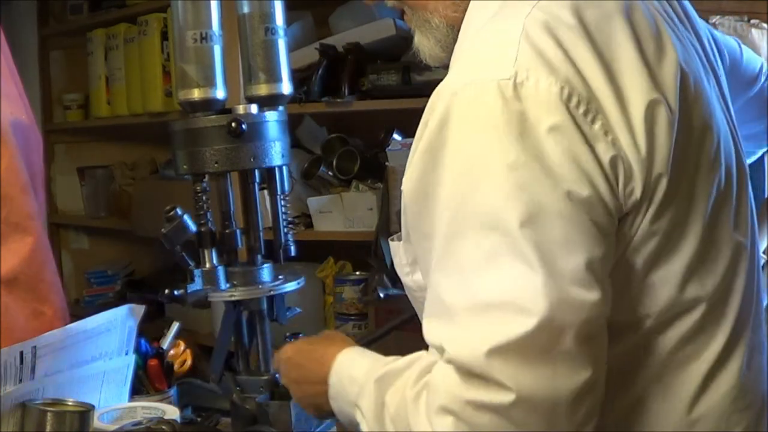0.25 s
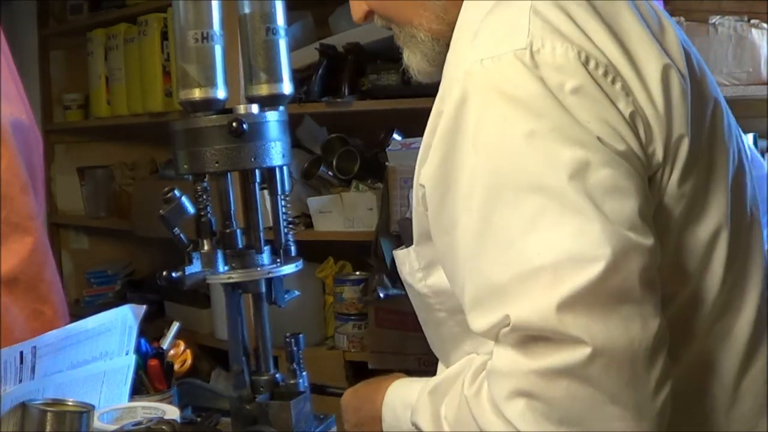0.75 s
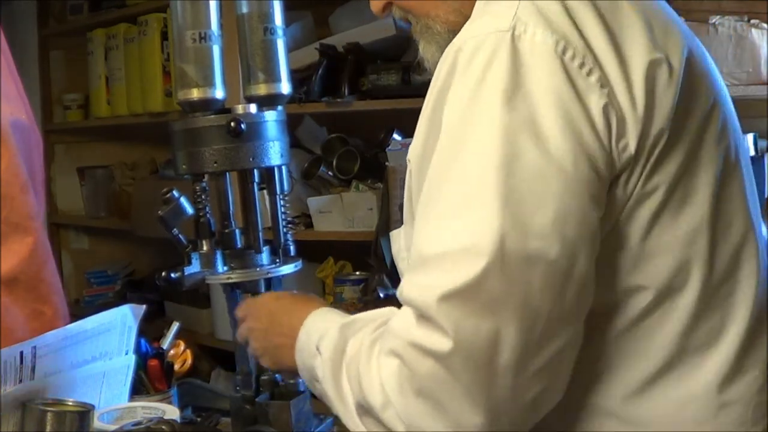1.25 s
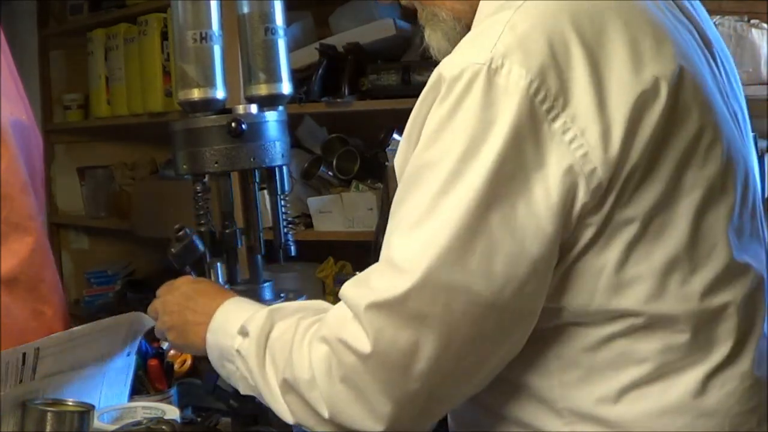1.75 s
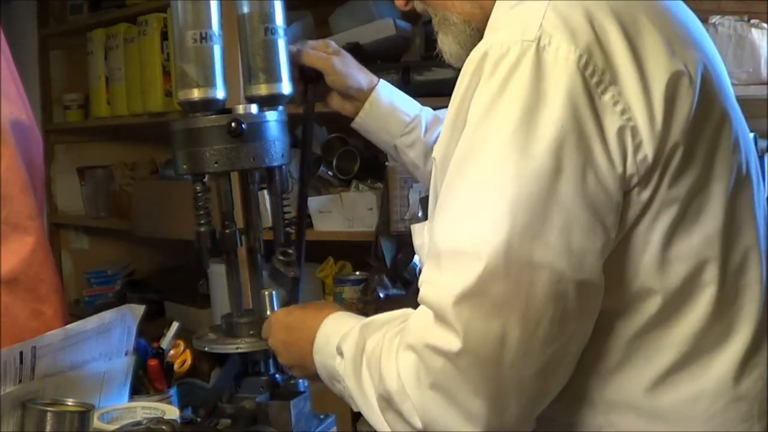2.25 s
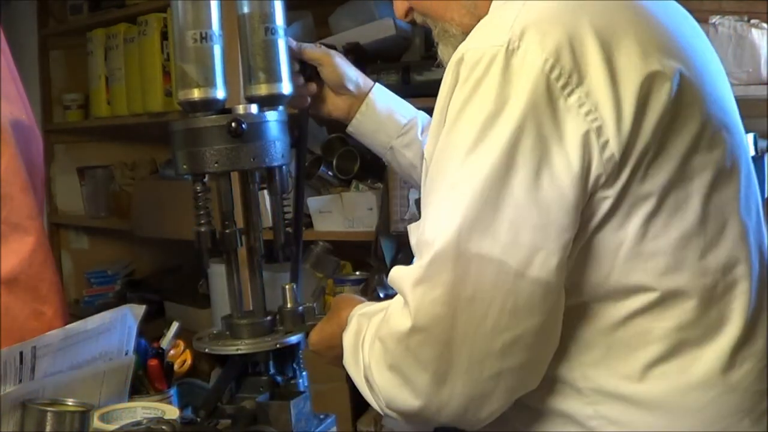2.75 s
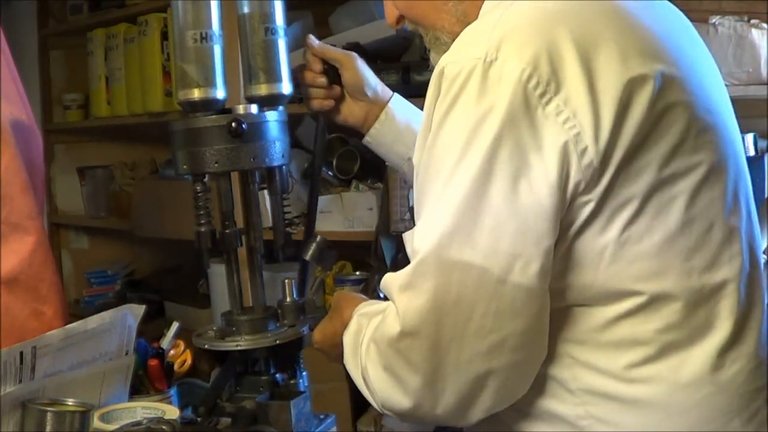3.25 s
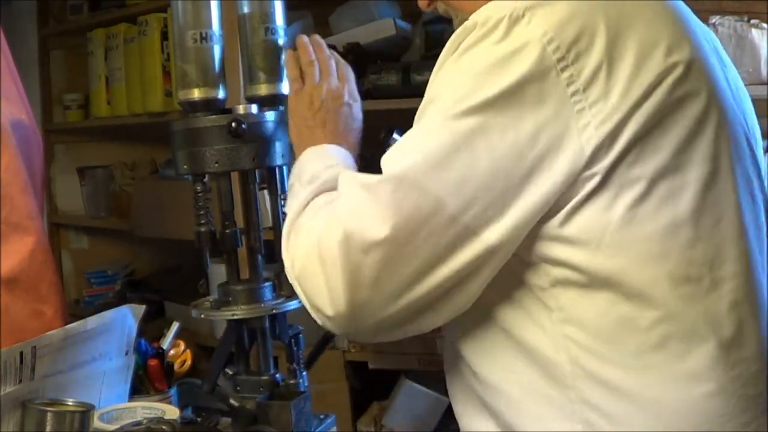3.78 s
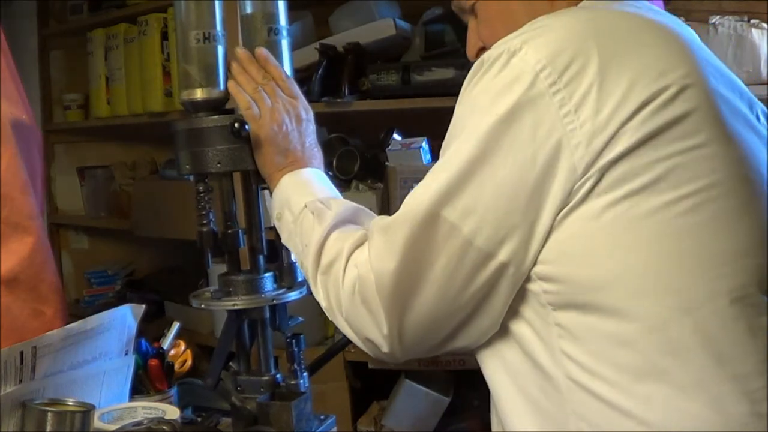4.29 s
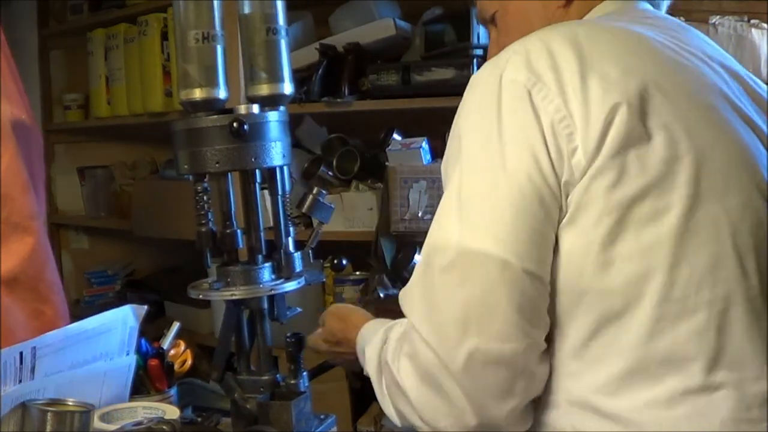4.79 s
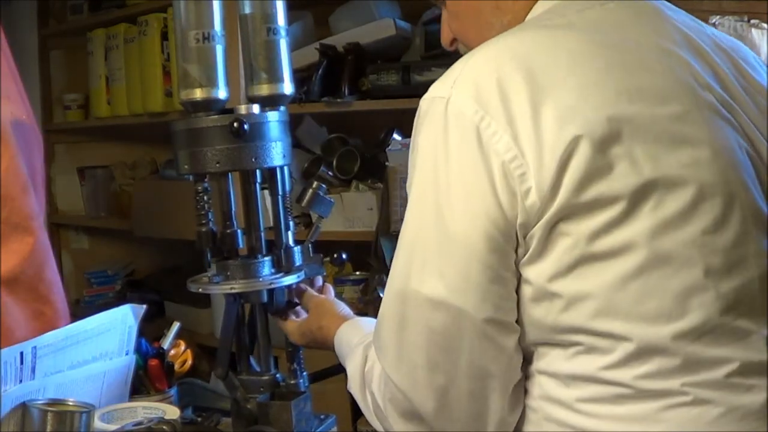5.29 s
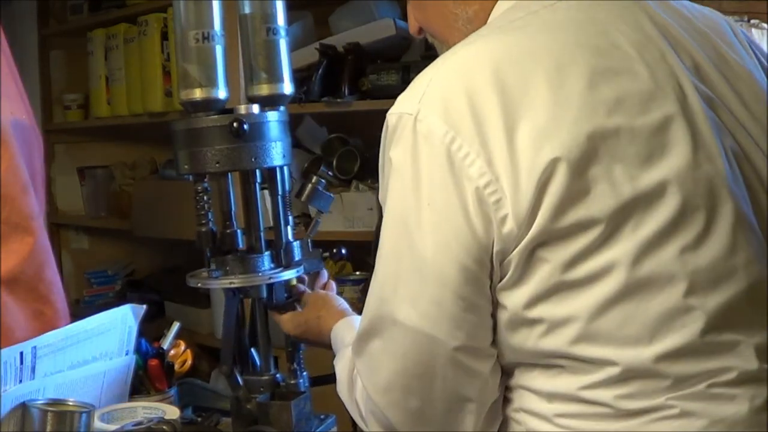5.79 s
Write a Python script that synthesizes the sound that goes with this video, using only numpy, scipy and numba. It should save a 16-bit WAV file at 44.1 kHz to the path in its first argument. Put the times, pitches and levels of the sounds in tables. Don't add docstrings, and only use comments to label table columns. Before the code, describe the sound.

Steel linkage, dies and light shells knock and rattle on a cast frame, a metre or two away indoors. Ear-piercing squeals open, followed by clunking groups and tiny bright ticks with faint rod jingle. After a pause a hard clack and squeal sound together; later a busy rattling, scraping burst over a low bench rumble dies into soft rubbing and constant microphone hiss.

```python
import sys
import numpy as np
from scipy import signal
from scipy.fft import rfft, irfft
from scipy.io import wavfile
from scipy.ndimage import uniform_filter1d
from numba import njit

SR = 44100
rng = np.random.default_rng(int(sys.argv[2]) if len(sys.argv) > 2 else 0)


def to_wav(s):
    ch = np.atleast_2d(s).T
    pcm = np.round(np.clip(ch, -1, 1) * 32767)
    wavfile.write(sys.argv[1], SR, pcm.astype(np.int16))


def gain_from_db(level_db):
    decades = np.asarray(level_db, float) / 20
    return 10 ** decades


N = 265923


def level(x, db):
    return x * gain_from_db(db) / np.sqrt(np.mean(x ** 2))


def band(x, lo_hz, hi_hz):
    sos = signal.butter(3, [lo_hz, min(hi_hz, 20000)], "band", fs=SR, output="sos")
    return signal.sosfilt(sos, x) / np.sqrt((hi_hz - lo_hz) / (SR / 2))


def walk(rate_hz):
    hold = int(SR / rate_hz)
    held = np.repeat(rng.standard_normal(N // hold + 1), hold)
    return 1.15 * uniform_filter1d(uniform_filter1d(held, hold), hold)[:N]


# frequency in Hz, level in dB per Hz.
HISS_SPECTRUM = [(25, -31), (50, -11), (80, -4.5), (130, -3), (250, 1.5), (500, 6.5), (1000, 4), (2000, 3),
                 (4000, -4.5), (8000, -8), (12000, -17), (15950, -10), (16100, -58)]
# frequency in Hz, left-right likeness from -1 to 1.
HISS_LIKENESS = [(60, 0.82), (150, 0.96), (350, -0.11), (1300, -0.51), (2400, -0.029), (8000, -0.69),
                 (15000, 0.7)]


def hiss():
    log_hz = np.log(np.maximum(np.fft.rfftfreq(N, 1 / SR), 1))

    def read(table):
        hz, value = np.transpose(table)
        return np.interp(log_hz, np.log(hz), value)

    like = np.clip(read(HISS_LIKENESS), -.9, .99)
    mid, side = (rfft(rng.standard_normal(N)) * gain_from_db(read(HISS_SPECTRUM)) for _ in range(2))
    sides = side * np.sqrt(1 - like) * np.array([[1], [-1]])
    return level(irfft(mid * np.sqrt(1 + like) + sides, N), -46.5)


def whistle():
    scan_hz, scan_db, beat_hz, crest_s = 15735, -50.5, 13.017, .9906
    t = np.arange(N) / SR
    throb = np.abs(np.cos(np.pi * beat_hz * (t - crest_s))) ** .65
    return gain_from_db(scan_db) * throb * np.sin(2 * np.pi * scan_hz * t)


@njit
def walls(x, lags, gain, damp):
    line, soft, out = np.zeros((8, 4096)), np.zeros(8), np.zeros((2, len(x)))
    for i in range(len(x)):
        total = 0.
        for k in range(8):
            soft[k] += (1 - damp) * (gain[k] * line[k, (i - lags[k]) & 4095] - soft[k])
            total += soft[k]
            out[k % 2, i] += soft[k]
        for k in range(8):
            line[k, i & 4095] = x[i] + soft[k] - total / 4
    return out


def room(x):
    t60_s, damp, room_db = 0.12, 0.26, -11
    lags = np.array([331, 457, 613, 787, 941, 1123, 1361, 1597])
    return gain_from_db(room_db) * walls(x, lags, gain_from_db(-60 * lags / SR / t60_s), damp)


# time in seconds, level in dB.
BENCH_SHIFT = [
    (4.4, -78),
    (4.55, -50),
    (4.8, -67),
    (5.0, -61),
    (5.15, -60.5),
    (5.3, -76),
]


def bench_shift():
    low = band(rng.standard_normal(N), 129, 210) + gain_from_db(-7.0) * band(rng.standard_normal(N), 40, 89)
    return gain_from_db(np.interp(np.arange(N) / SR, *np.transpose(BENCH_SHIFT))) * low


# time in seconds, effort in dB, lightness of touch in dB.
RUB_EFFORT = [(0, -57.5, 7), (.13, -47.5, 3), (.3, -44.5, 3.5), (.44, -48.5, 1), (.9, -56.5, 5.5),
              (1.09, -50, 2.5), (1.95, -48, 1), (2.74, -49, 2.5), (3.4, -56.5, 2), (3.5, -49.5, 3),
              (3.84, -40.5, 0.5), (4.03, -48.5, 3.5), (4.5, -44.5, -1), (4.68, -32.5, -0.5),
              (4.8, -42, 2.5), (5.31, -49.5, 0.8), (5.95, -54.5, 5.5), (6.03, -51.5, 16)]


def rub():
    t = np.arange(N) / SR
    s, effort_db, light_db = np.transpose(RUB_EFFORT)
    hiss_db = effort_db + light_db
    ranges = [(effort_db - light_db - 4.5, 200, 1300),
              (effort_db - 2.0, 1300, 5200),
              (hiss_db - 0.3, 5200, 10500),
              (0.7 * hiss_db - 18.5, 10500, 17500)]
    out = np.zeros(N)
    for db, lo_hz, hi_hz in ranges:
        grain = rng.standard_normal(N) * gain_from_db(1.5 * walk(200) + 1.1 * walk(30))
        out += gain_from_db(np.interp(t, s, db)) * band(grain, lo_hz, hi_hz)
    return out


# start in seconds, length in seconds, level in dB, lowest Hz, highest Hz.
SCUFF_EVENTS = [
    (1.673, 0.06, -42, 8800, 12500),
    (1.91, .036, -36, 9500, 13000),
    (3.813, 0.011, -39, 13000, 15500),
    (3.968, .03, -43, 7500, 13500),
    (4.02, 0.031, -45, 7000, 12500),
    (4.59, .02, -34.5, 7000, 15500),
    (4.785, 0.023, -34.5, 5000, 10500),
    (1.166, .02, -41, 350, 1680),
    (1.249, 0.012, -47.5, 1480, 3000),
]


def scuffs():
    out, grain = np.zeros(N), rng.standard_normal(N) * gain_from_db(1.8 * walk(400))
    for s, length_s, db, lo_hz, hi_hz in SCUFF_EVENTS:
        span = np.arange(int(s * SR), int((s + 1.5 * length_s) * SR))
        part = (span / SR - s) / length_s
        swell = np.clip(8 * part, 0, 1) * np.clip(3 - 2 * part, 0, 1)
        out[span] += gain_from_db(db) * swell * band(grain[span], lo_hz, hi_hz)
    return out


# start in seconds, peak in dB, centre in Hz.
TICK_EVENTS = [(.3453, -20, 4600), (.3499, -16, 4560), (0.3545, -18, 4400), (.9497, -25, 12900),
               (.9687, -27, 4970), (1.1048, -16, 11400), (1.1049, -22, 8100), (1.4397, -28, 13400),
               (1.4983, -14, 4800), (1.5395, -29, 6000), (1.5823, -31, 13500), (1.6731, -17, 11500),
               (1.813, -33, 11000), (1.858, -27, 13500), (1.9049, -12.5, 6140), (1.9052, -20, 14000),
               (1.944, -9, 10650), (1.9463, -21, 10900), (1.9937, -32, 5000), (2.0524, -11, 12900),
               (2.0635, -11, 3000), (2.0708, -21, 11500), (2.3048, -16, 6540), (2.3121, -16, 12800),
               (2.315, -13, 2820), (2.323, -9, 6000), (2.577, -7, 12500), (2.578, -10, 7900),
               (2.582, -15, 6500), (2.582, -17, 12500), (2.655, -33, 11000), (2.6745, -27, 6500),
               (3.1236, -10, 13600), (3.1238, -13, 9350), (3.1281, -16.5, 5700), (3.1349, -22, 9500),
               (3.8769, -17, 5600), (3.8867, -21, 12600), (4.1366, -24, 5100), (4.166, -29, 7500),
               (4.166, -32, 13500), (4.4324, -17, 4460), (4.4442, -25, 5000), (4.538, -20, 7800),
               (4.5905, -24, 11000), (4.663, -8, 14500), (4.665, -9, 8300), (4.6885, -18, 8000),
               (4.7054, -28, 13000), (4.7306, -21, 13000), (4.7376, -20, 6500), (4.742, -19, 9000),
               (4.7755, -16, 3000), (4.786, -23, 2310), (4.7945, -20, 6070)]


def ticks():
    t60_s, rise_s, spread = .008, 0.00014, 1.11
    t = np.arange(int(.02 * SR)) / SR
    out = np.zeros(N + len(t))
    scatter = 1 + .03 * rng.standard_normal((len(TICK_EVENTS), 5))
    cluster = spread ** np.arange(-2, 3) * scatter
    for (s, db, hz), ratios in zip(TICK_EVENTS, cluster):
        modes = np.sin(2 * np.pi * np.minimum(hz * ratios, 15600)[:, None] * t).sum(axis=0)
        i = int(s * SR)
        out[i:i + len(t)] += gain_from_db(db - 5.0 - 60 * t / t60_s) * (1 - np.exp(-t / rise_s)) * modes
    return out[:N]


def steel(modes, strikes, waver, flicker_db):
    t = np.arange(int(.6 * SR)) / SR
    out = np.zeros(N + len(t))
    chance = rng.standard_normal((len(strikes), len(modes), 2))
    for m, (hz, mode_db, t60_s) in enumerate(modes):
        drift = 1 + waver * walk(27)[:len(t)]
        chatter = gain_from_db(flicker_db * walk(149.5)[:len(t)])
        for k, (s, db) in enumerate(strikes):
            favour_db, detune = 1.3 * chance[k, m, 0], 1 + 0.00215 * chance[k, m, 1]
            turns = hz * detune * np.cumsum(np.roll(drift, shift=1733 * k)) / SR
            swell = gain_from_db(db + mode_db + favour_db - 60 * t / t60_s) * np.roll(chatter, shift=1733 * k)
            i = int(s * SR)
            out[i:i + len(t)] += swell * np.sin(2 * np.pi * turns)
    return out[:N]


# mode in Hz, level in dB, t60 in seconds.
LATCH_MODES = [(1513, -9.5, 0.12), (4900, -3, 0.042), (7070, -8, 0.023), (9200, 1, 0.086),
               (9350, 2.5, 0.08), (12740, -4, .05), (14600, -6, .05)]
# start in seconds, level in dB.
LATCH_STRIKES = [(.949, -32), (1.1045, -38), (1.452, -32), (1.4825, -43), (1.5395, -42), (1.546, -43),
                 (1.597, -36), (1.662, -39.5), (2.3675, -32), (2.3762, -40), (4.6135, -42)]
# mode in Hz, level in dB, t60 in seconds.
ROD_MODES = [(3750, -12, .6), (5600, -9, .6), (5900, -6, .6), (8430, -2, .7), (8810, -1, .7),
             (12600, -7, .5)]
# start in seconds, level in dB.
ROD_STRIKES = [
    (1.813, -46),
    (1.833, -45),
    (1.994, -46),
    (2.1, -44),
    (2.311, -45),
    (2.39, -43),
    (2.47, -47),
]


def latch_rods_and_tube():
    tube = steel([(9900, 0, 0.25)], [(4.796, -37.5)], .002, 2.5)
    return steel(LATCH_MODES, LATCH_STRIKES, 0.0028, 3.0) + steel(ROD_MODES, ROD_STRIKES, .008, 4) + tube


def single_parts(table, rise_s, split, rough_db):
    t = np.arange(int(.3 * SR)) / SR
    out = np.zeros(N + len(t))
    for s, db, hz, t60_s in table:
        pair = np.sin(2 * np.pi * hz * t) + 0.34 * np.sin(2 * np.pi * hz * split * t)
        swell = gain_from_db(db - 60 * t / max(t60_s, .01)) * (1 - np.exp(-t / rise_s))
        i = int(s * SR)
        out[i:i + len(t)] += swell * pair
    return out[:N] * gain_from_db(rough_db * walk(900))


# start in seconds, peak in dB, pitch in Hz, t60 in seconds.
THUMP_EVENTS = [(0.346, -41.5, 400, 0.3), (0.947, -14.5, 436, 0.039), (0.969, -30, 350, 0.069),
                (0.95, -35.5, 220, 0.12), (5.0, -33, 150, 0.2), (1.112, -39, 990, 0.13),
                (.951, -24, 976, 0.047), (4.538, -25.5, 814, 0.052), (1.184, -27, 680, .06),
                (1.19, -22, 830, 0.07), (1.4515, -13, 410, 0.045), (1.456, -19, 810, .05),
                (1.453, -22, 1150, .05), (1.583, -23.5, 500, .12), (1.6, -22, 810, .07),
                (4.636, -20, 920, .04), (3.815, -28, 430, .1), (1.494, -31, 800, 0.074),
                (1.592, -13, 981, 0.057), (1.669, -34, 392, 0.074), (1.872, -36, 450, 0.1),
                (1.95, -33, 480, 0.08), (2.072, -34, 540, 0.062), (2.603, -34, 416, 0.05),
                (3.877, -21, 425, 0.054), (4.394, -35, 564, 0.077), (4.564, -28.5, 420, 0.11),
                (4.666, -28, 460, 0.063), (4.686, -12, 956, 0.037), (4.803, -21.5, 596, 0.055)]
# start in seconds, peak in dB, pitch in Hz, t60 in seconds.
KNOCK_EVENTS = [(0.3486, -22.5, 1886, 0.058), (0.503, -31, 1520, .05), (0.5018, -29, 1250, 0.028),
                (0.9188, -30, 1816, 0.084), (0.9477, -16, 1578, 0.054), (1.0166, -28, 1550, 0.066),
                (1.0984, -11, 1712, 0.027), (1.1837, -26, 1520, 0.09), (1.4516, -25, 1550, 0.042),
                (1.491, -20, 1760, 0.061), (1.5938, -9, 1540, 0.07), (1.44, -26, 1820, .05),
                (1.1105, -20, 1650, .04), (1.0985, -22, 3150, .03), (2.0622, -19.5, 2183, 0.068),
                (3.8155, -10, 1594, 0.075), (3.8781, -16, 1552, 0.063), (3.875, -13, 3380, 0.045),
                (3.875, -15, 5780, 0.04), (3.877, -16, 5050, .07), (3.875, -21, 2480, .03),
                (3.813, -23, 3520, .07), (3.813, -23, 5500, .04), (3.814, -25, 2350, .05),
                (1.603, -17.5, 1266, .09), (4.779, -23, 3560, 0.065), (.3475, -14, 4590, 0.044),
                (1.4915, -22, 2100, .06), (1.4545, -22, 2050, .05), (4.0721, -25, 2025, 0.032),
                (4.4313, -20.5, 2180, 0.038), (4.5725, -16, 1260, 0.037), (4.6304, -13, 1380, 0.025),
                (4.6306, -16, 2000, .03), (4.7745, -15, 2150, .03), (4.803, -20, 1900, .04),
                (4.603, -24, 1850, .03), (4.7561, -13.5, 2240, 0.022), (4.774, -10, 2730, 0.023),
                (4.7864, -9.5, 2080, 0.027), (4.795, -24, 1180, 0.11), (4.9501, -29, 1233, 0.058)]
# start in seconds, peak in dB, pitch in Hz, t60 in seconds.
PING_EVENTS = [(1.9445, -19, 10530, 0.015), (2.0527, -11, 6460, .015), (2.3112, -10.5, 9500, 0.018),
               (3.128, -28, 6150, 0.066), (4.731, -22, 9400, 0.03), (4.795, -23, 5240, 0.03),
               (1.4935, -22, 4700, .05), (2.3765, -25, 7170, .02), (2.3678, -25, 4900, .05),
               (1.6618, -27, 12600, .03), (1.094, -31, 12600, .09), (1.9052, -17, 6200, .025),
               (1.583, -20, 4500, .05), (1.447, -21, 4750, .05), (1.4545, -20, 3500, .04),
               (1.4575, -24, 7900, .03), (4.6625, -17, 14900, .03), (4.667, -21, 8300, .04),
               (2.5775, -15, 12400, .02), (2.598, -30, 14900, .06)]


def thumps_knocks_and_pings():
    thumps = single_parts(THUMP_EVENTS, 0.0018, 1.2, 3.7)
    knocks = single_parts(KNOCK_EVENTS, 0.0011, 1.06, 2.6)
    pings = single_parts(PING_EVENTS, 0.00028, 0.63, 3.3)
    return thumps + gain_from_db(-4.0) * knocks + gain_from_db(-1.0) * pings


# mode in Hz, level in dB, t60 in seconds.
FRAME_MODES = [(400, -26, 0.26), (540, 1.5, 0.066), (857, -1, 0.036), (990, -2, 0.19), (1608, -5.5, 0.046),
               (1844, -6.5, .06), (4700, -10.5, 0.031), (5790, -14.5, 0.023)]


def frame(x, lo_hz, hi_hz):
    out = np.zeros(N)
    for hz, db, t60_s in FRAME_MODES:
        if lo_hz <= hz < hi_hz:
            r = np.exp(-np.log(1000) / (min(t60_s, 0.15) * SR))
            pole = r * np.exp(2j * np.pi * hz / SR)
            out += gain_from_db(db) * np.sqrt(2 * (1 - r * r)) * signal.lfilter([1], [1, -pole], x).imag
    return out


CLUNK_BLOWS = [(.3472, -27, -14, 0.18), (.9486, -18, -8, 0.11), (1.18, -43, 10, 0.085),
               (1.446, -21, -1, 0.083), (1.4521, -17, -12.5, 0.13), (1.5827, -17, -11, 0.12),
               (1.592, -29, 9.5, 0.077), (2.0634, -14, -21, .12), (3.3762, -37, -21, 0.14),
               (3.8137, -14.5, -14, 0.15), (4.4311, -19, -10, 0.076), (4.6298, -18, -5, 0.07),
               (4.797, -19, -13, 0.05), (2.3124, -14.5, -21, 0.094)]
CLACK_BLOWS = [(1.1024, -30, -2, 0.14), (1.6611, -30, -1, 0.072), (1.6724, -34, -11.5, 0.26),
               (1.8574, -35, -4.5, 0.093), (1.939, -25, -13, 0.12), (1.9954, -41, -1, 0.078),
               (2.583, -38, -9, .09), (2.5924, -30.5, -9, 0.21), (2.6744, -40, -17, 0.14),
               (3.8854, -23.5, -5, 0.069), (4.0724, -49, 7, 0.15), (4.3944, -52, -5, .046),
               (4.501, -38.5, 2, 0.26), (4.5376, -35, -7, 0.089), (4.5724, -37, 8.5, 0.083),
               (4.59, -24.5, -4.5, 0.095), (4.6624, -21, 0, 0.06), (4.6847, -25, -3, 0.11),
               (4.7296, -41, -14, .077), (4.7354, -27, -18, 0.046)]
TAP_BLOWS = [(.3428, -20, -6.5, 0.083), (.5055, -41.5, 6, 0.058), (.9163, -28.5, -1, 0.079),
             (1.0161, -38, -0.5, .065), (1.0975, -17.5, -12, 0.055), (1.4905, -23.5, -7, 0.15),
             (2.3216, -19.5, -19, 0.054), (3.8748, -14, -17, 0.085), (4.7564, -37.5, 10, 0.07),
             (4.7735, -28.5, 4.5, 0.13), (4.7858, -29, -10, 0.1)]
SNAP_BLOWS = [
    (1.4203, -37, 4, 0.068),
    (1.9047, -21.5, -15.5, 0.15),
    (2.0525, -19, -17, 0.13),
    (2.3035, -22.5, -15, 0.17),
    (2.368, -34, -16, 0.12),
    (2.577, -20.5, -17.5, .12),
    (3.1233, -22.5, -18.5, 0.11),
    (3.9994, -43, 12, 0.064),
    (4.9499, -39, 4, 0.12),
]


def blows():
    # blows, thump dB over the knock, tick dB over the clack, share of first crack 0-1
    kinds = [(CLUNK_BLOWS, -5, -21, 0.27), (CLACK_BLOWS, -4, 0.39, 0.35),
             (TAP_BLOWS, -17, -34, .3), (SNAP_BLOWS, -25, 0.6, 0.62)]
    t = np.arange(int(.3 * SR)) / SR
    push = np.zeros((4, N + len(t)))
    rise_s = np.array([[.003], [.0012], [.0003], [.0001]])
    stay = np.array([[1.3], [1.1], [.95], [.8]])
    crack = np.array([[0], [.7], [3.1], [3.6]]) * np.exp(-t / .0007)
    for table, thump_db, tick_db, sharp in kinds:
        for s, clack_db, knock_db, t60_s in table:
            db = clack_db + np.array([[knock_db + thump_db], [knock_db], [0], [tick_db]])
            soft = 1 + 2.7 * gain_from_db(min(knock_db, 6))
            rattle = gain_from_db(-60 * t / (max(t60_s, .01) * stay))
            onset = 1 - np.exp(-t / (rise_s * soft))
            i = int(s * SR)
            push[:, i:i + len(t)] += gain_from_db(db) * onset * (sharp * crack / soft + rattle)
    contacts = np.sign(rng.standard_normal((4, N))) * gain_from_db(2.23 * walk(700))
    thump, knock, clack, tick = push[:, :N] * contacts
    return (gain_from_db(2.0) * band(thump, 257, 1050) + gain_from_db(-5.5) * frame(thump, 0, 700)
            + gain_from_db(-1.0) * band(knock, 830, 2370) + gain_from_db(-10.5) * frame(knock, 700, 2500)
            + gain_from_db(-10.0) * band(clack, 2400, 8270) + gain_from_db(-10.5) * frame(clack, 2500, 8000)
            + gain_from_db(-4.0) * band(tick, 5860, 14400))


# first crest in seconds, pitch in Hz, crest in dB, bounce period in seconds,
# fade in dB by the second bounce.
SQUEAK_EVENTS = [
    (0.0235, 9034, -24.5, 0.033, 9),
    (0.38, 9220, -21, 0.012, 5),
    (.3791, 8760, -26, .011, 9),
    (.3983, 8620, -27, 0.011, 4),
    (3.6852, 9020, -18.5, 0.028, 30),
    (4.5378, 10910, -15.5, 0.019, 6.5),
    (4.6159, 9200, -21.5, 0.012, 6),
]


def squeaks(wobble):
    shape, fade_power, cling = 0.9, 1.9, .15
    out = np.zeros(N)
    for crest_s, hz, db, period_s, fade_db in SQUEAK_EVENTS:
        span = np.arange(int((crest_s - period_s / 2) * SR), int((crest_s + 4.5 * period_s) * SR))
        bounce = (span / SR - crest_s) / period_s
        grip = np.abs(np.cos(np.pi * bounce)) ** shape + cling * np.clip(2 * bounce, 0, 1)
        swell = gain_from_db(db - fade_db * np.abs(bounce) ** fade_power) * grip
        out[span] += swell * np.sin(2 * np.pi * hz * np.cumsum(wobble[span] ** 3) / SR)
    return out


# time in seconds, pitch in Hz, grip in dB, throb depth in dB.
SQUEAL_CURVES = [
    [(.281, 10700, -43, -1), (.288, 10781, -8, 0.3), (.3, 10720, -5.5, 0.3), (.312, 10600, -7.5, 0.3),
     (.318, 10560, -4, 0.3), (.3356, 10210, -5, 0.3), (.352, 10290, -4.5, 3), (.372, 10310, -14.5, 4),
     (.425, 10325, -44, 12)],
    [(.598, 10340, -55, -1), (.6195, 10520, -30, 1), (.629, 10670, -7.5, 0.3), (.635, 10740, -3.5, 0.3),
     (.652, 10730, -3.5, 0.3), (.672, 10660, -5.5, 0.3), (.697, 10470, -8, 0.3), (.718, 10420, -25, 3),
     (.762, 10430, -48, 6)],
    [(3.697, 8900, -37, 0.3), (3.71, 9030, -28, 0.6), (3.73, 8870, -23, 7), (3.755, 8970, -18.5, 10),
     (3.782, 8900, -17.5, 5), (3.812, 8970, -24.5, 6), (3.838, 9001, -8, 0), (3.862, 8993, -11.5, -1),
     (3.9, 9015, -36, 5)],
]
# one crest in seconds, period in seconds, quickening in cycles/s^2,
# share of the double-rate throb 0-1.
SQUEAL_THROBS = [
    (.3448, .0117, 0.1, .75),
    (.6806, .0148, 0.1, .25),
    (3.84, .019, 66, .05),
]
# time in seconds, depth in dB, width in seconds.
GRIP_SLIPS = [(.2905, 5, .002), (.309, 2, .004), (.3212, 5, .0012), (.3268, 5, .0012), (.3325, 8, .0015),
              (.3365, 5, 0.00093), (.3418, 2, .0012), (0.353, 16, 0.0018), (.361, 16, 0.0028),
              (.367, 9, 0.001), (3.851, 4, .004), (.3725, 8, .001), (.385, 10, .0015), (.6455, 3, .003),
              (.6765, 3, .002), (.686, 5, .004), (.6987, 12, .0012), (.7045, 4, .0012), (.709, 10, .001),
              (.7155, 16, .0015), (.723, 10, .0015), (.731, 10, .0015)]


def long_squeals(wobble):
    ragged = .5
    out = np.zeros(N)
    for curve, (crest_s, period_s, quicken, double) in zip(SQUEAL_CURVES, SQUEAL_THROBS):
        s, hz, grip_db, depth_db = np.transpose(curve)
        span = np.arange(int(s[0] * SR), int(s[-1] * SR))
        t = span / SR
        late = t - crest_s
        turn = np.pi * (late / period_s + quicken * late ** 2)
        dip = (1 - double) * np.sin(turn) ** 2 + double * np.sin(2 * turn) ** 2
        depth = np.interp(t, s, depth_db)
        slip_db = sum(db * np.exp(-((t - at) / width) ** 2) for at, db, width in GRIP_SLIPS)
        swell = gain_from_db(np.interp(t, s, grip_db) - depth * dip ** 1.5 - slip_db)
        pitch_hz = np.interp(t, s, hz) * wobble[span] ** (4.5 + ragged * depth)
        out[span] += uniform_filter1d(swell, size=60) * np.sin(2 * np.pi * np.cumsum(pitch_hz) / SR)
    return out


def scene():
    wobble = 1 + .0004 * walk(300)
    pivots = gain_from_db(3.2) * (long_squeals(wobble) + squeaks(wobble))
    high_pass = signal.butter(3, 172, "high", fs=SR, output="sos")
    struck = signal.sosfilt(high_pass, blows() + thumps_knocks_and_pings() + latch_rods_and_tube())
    clatter = struck + rub() + bench_shift() + ticks() + scuffs()
    direct = pivots * np.array([[gain_from_db(.7)], [gain_from_db(-.7)]]) + clatter * np.array([[gain_from_db(.3)], [gain_from_db(-.3)]])
    direct += gain_from_db(-19.0) * np.array([np.roll(clatter, shift=71), np.roll(clatter, shift=113)])
    direct += gain_from_db(-15) * np.roll(band(clatter, 900, 7000), shift=37) * np.array([[.5], [-.5]])
    return direct + room(clatter + gain_from_db(-0.5) * pivots) + hiss() + whistle()


def band_limit(x):
    return signal.sosfilt(signal.butter(12, 17170, fs=SR, output="sos"), x)


def record(dry):
    hz = np.fft.rfftfreq(N, 1 / SR)
    above = irfft(rfft(dry) * np.clip((hz - 11150) / 300, 0, 1), N)
    squeal_power = signal.lfilter([.006], [1, -.994], band(dry.mean(axis=0), 9900, 11000) ** 2)
    hushed = uniform_filter1d(1. * (squeal_power > .3), size=300)
    top_cut = signal.ellip(7, .3, 55, 15950, fs=SR, output="sos")
    mix = np.clip(signal.sosfilt(top_cut, dry - hushed * above), -1, 1)
    return band_limit(mix)


dry = scene()
out = record(dry)
to_wav(out)
```